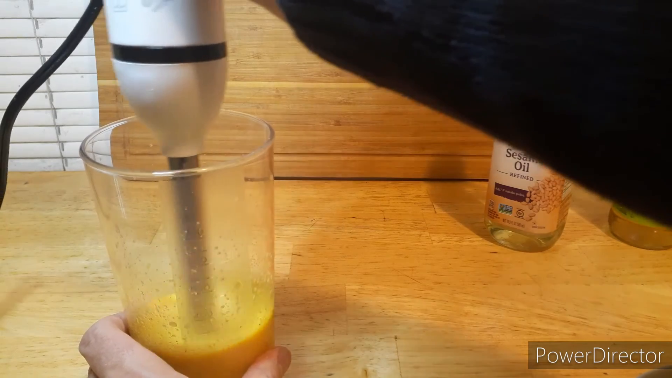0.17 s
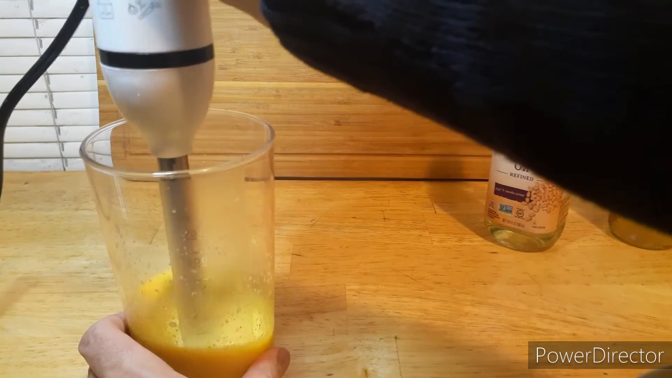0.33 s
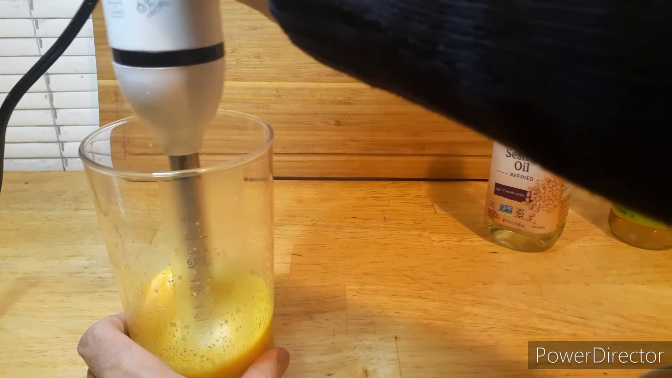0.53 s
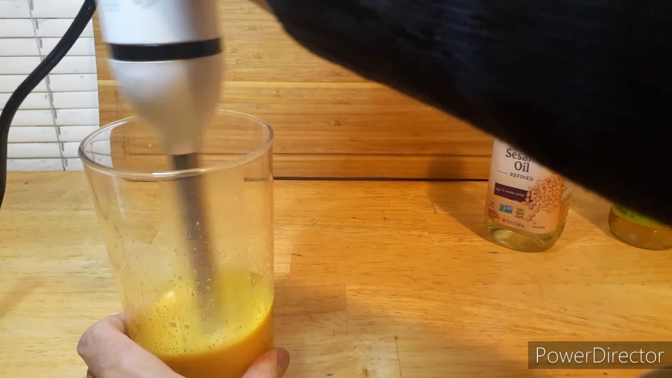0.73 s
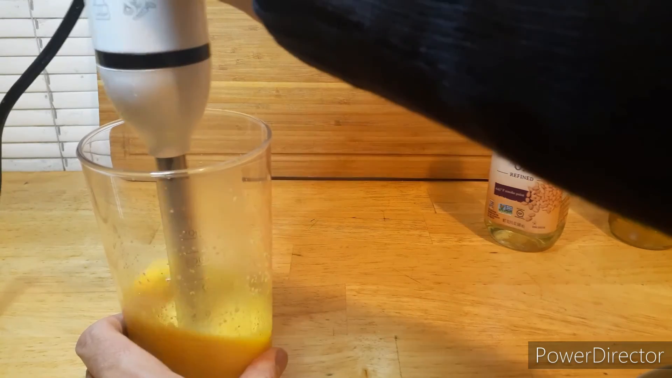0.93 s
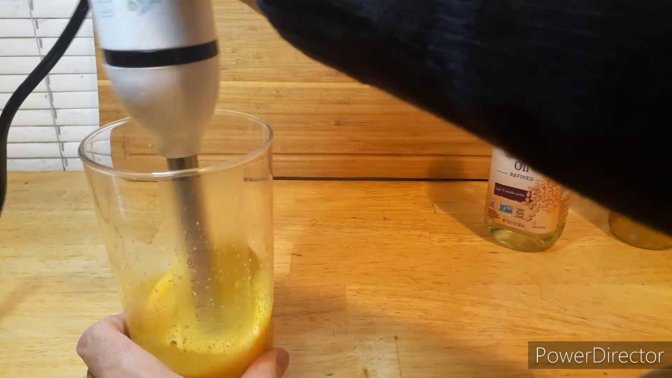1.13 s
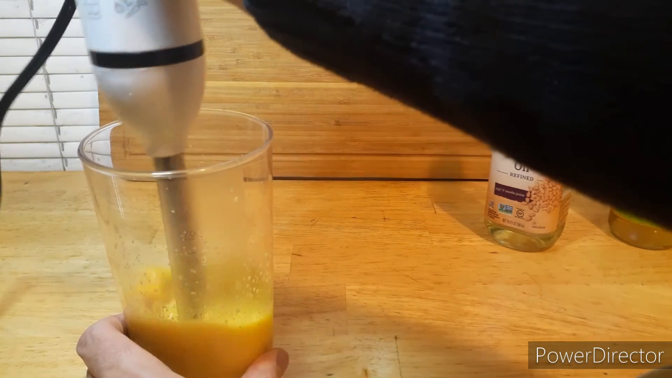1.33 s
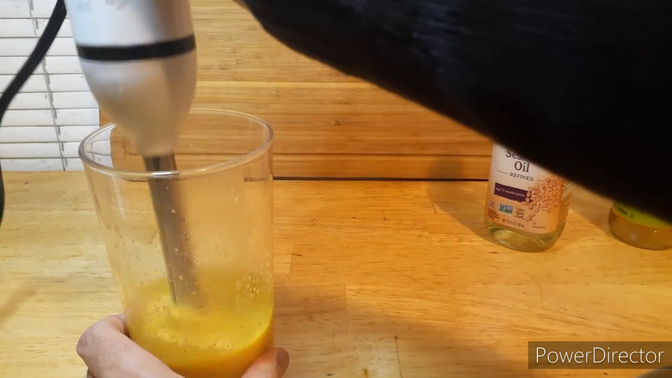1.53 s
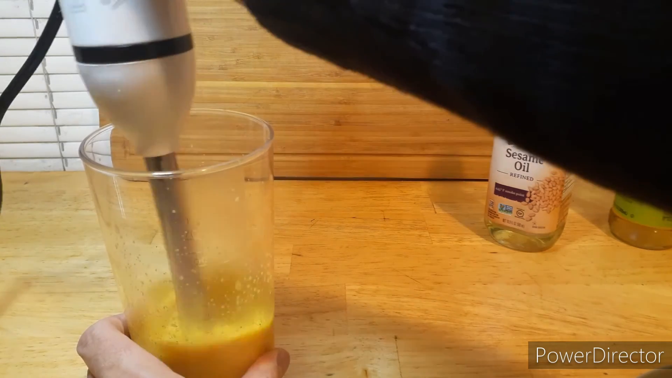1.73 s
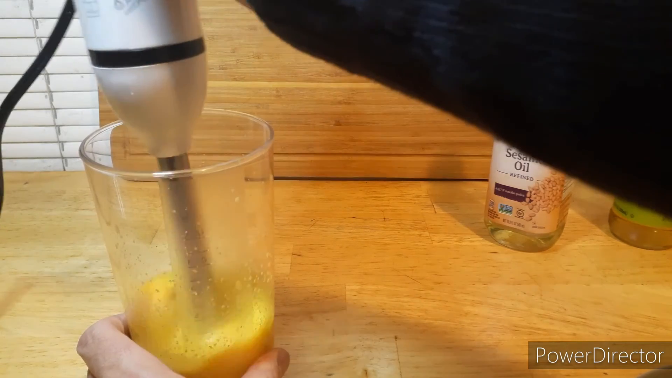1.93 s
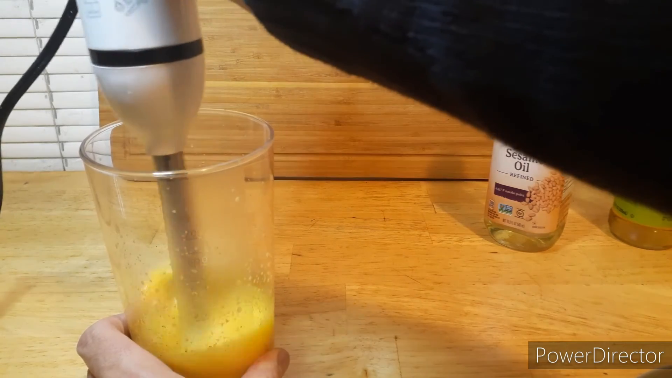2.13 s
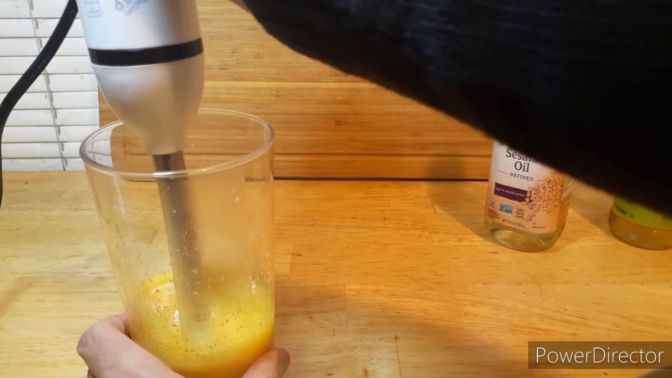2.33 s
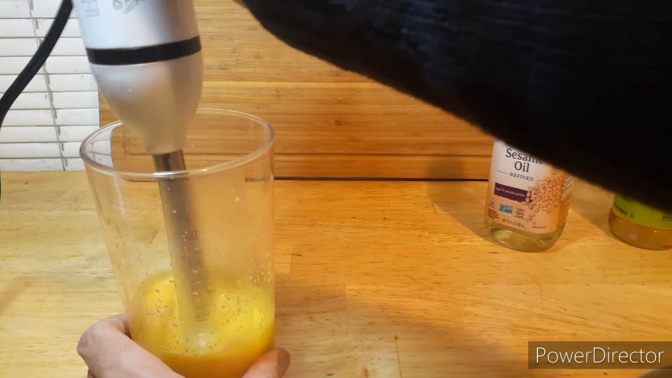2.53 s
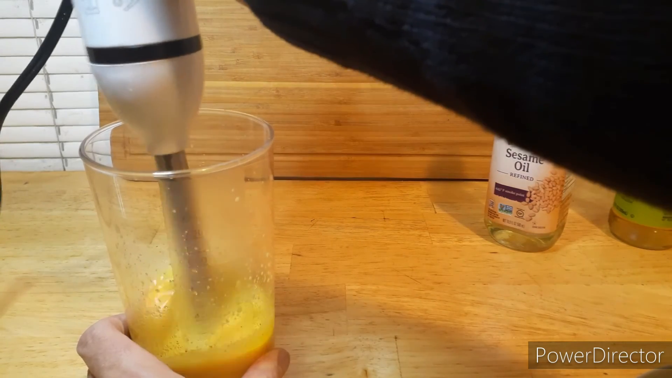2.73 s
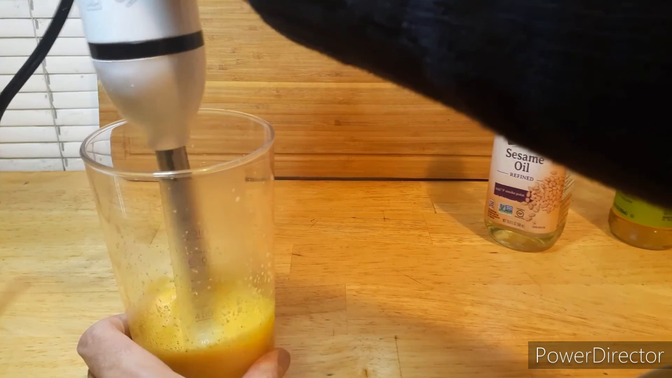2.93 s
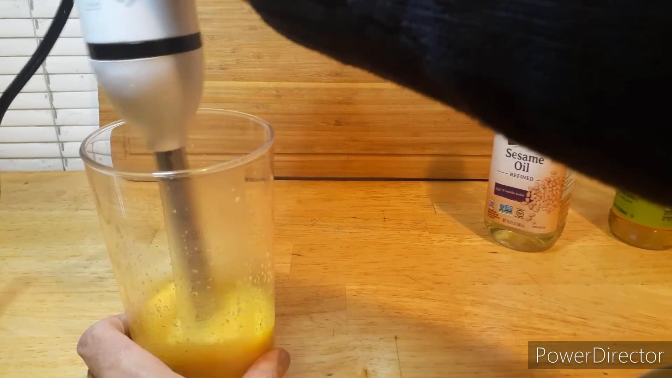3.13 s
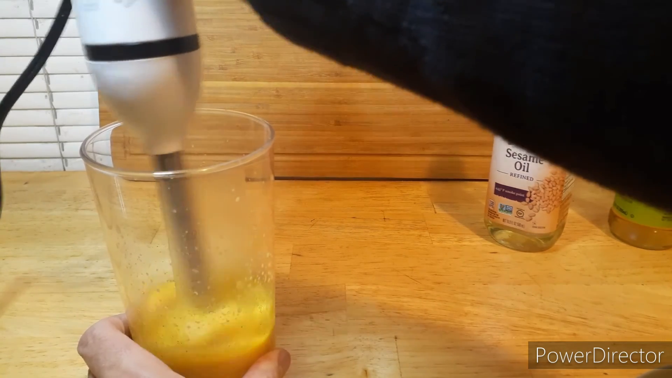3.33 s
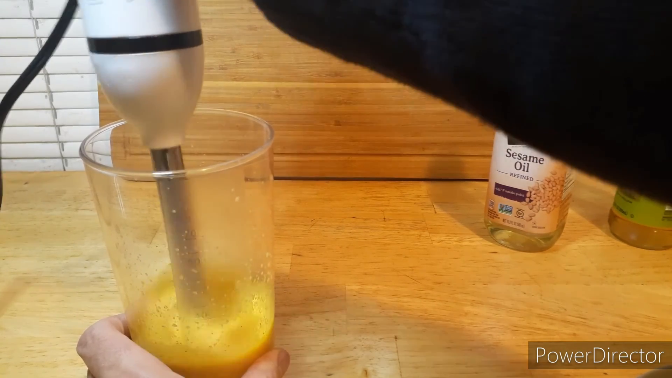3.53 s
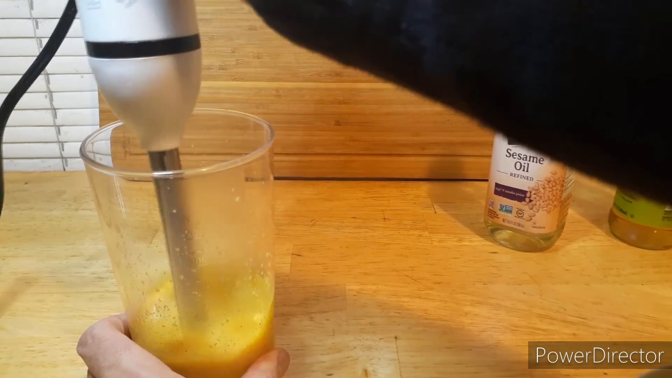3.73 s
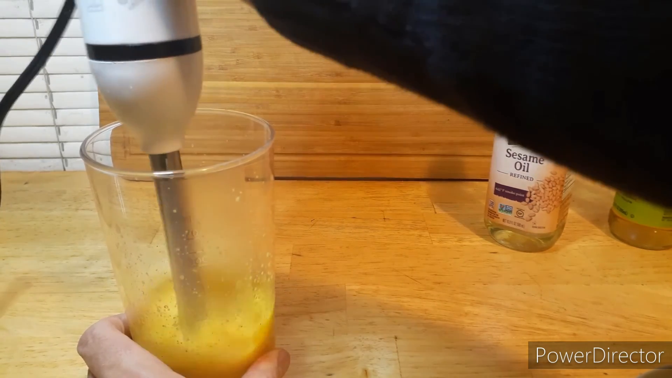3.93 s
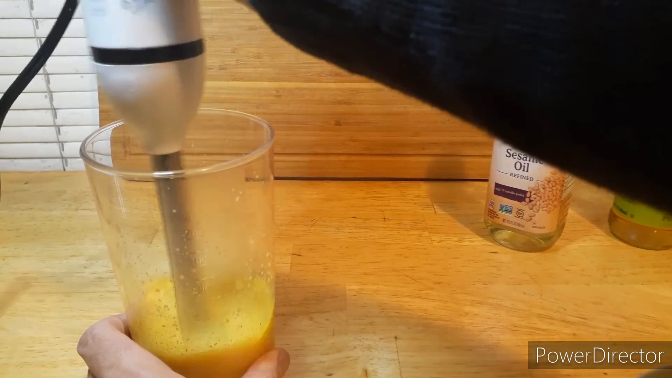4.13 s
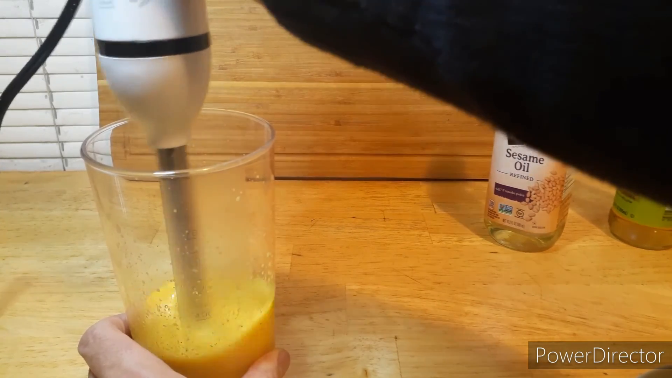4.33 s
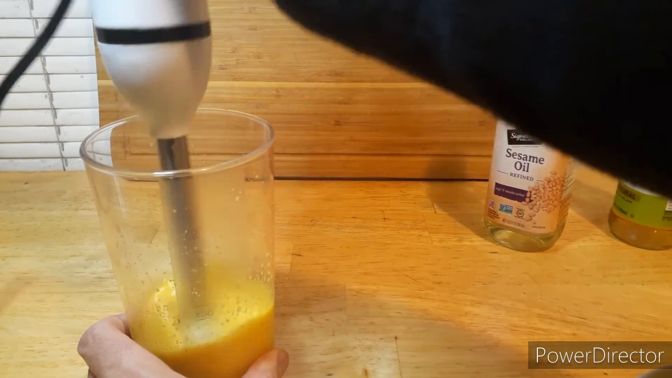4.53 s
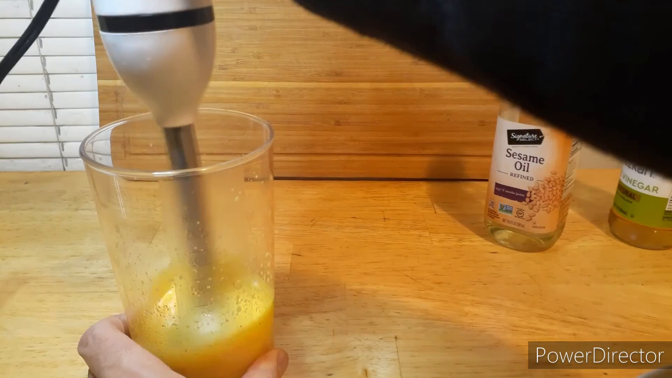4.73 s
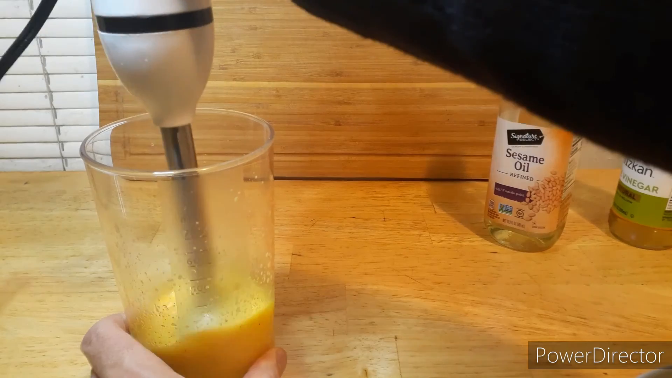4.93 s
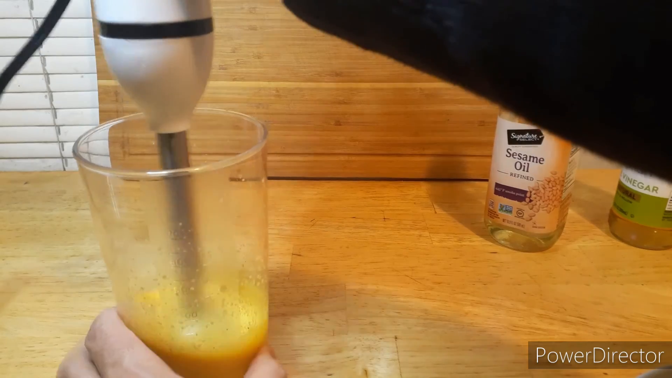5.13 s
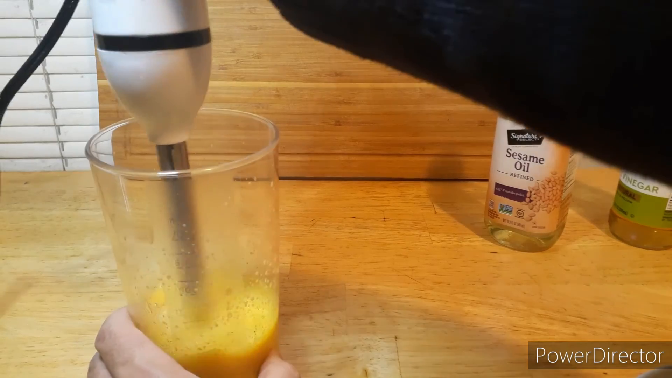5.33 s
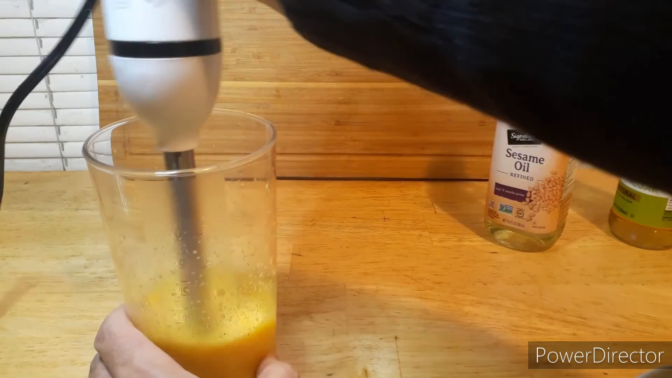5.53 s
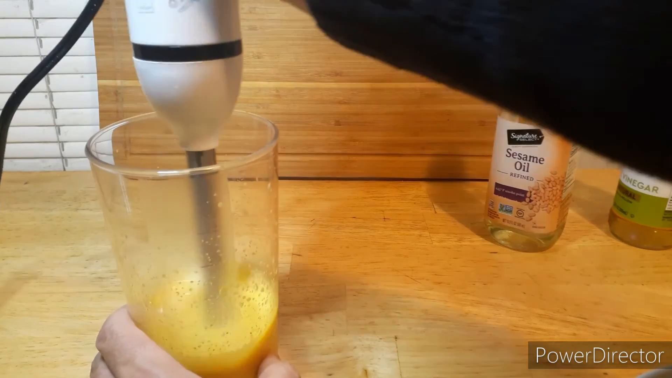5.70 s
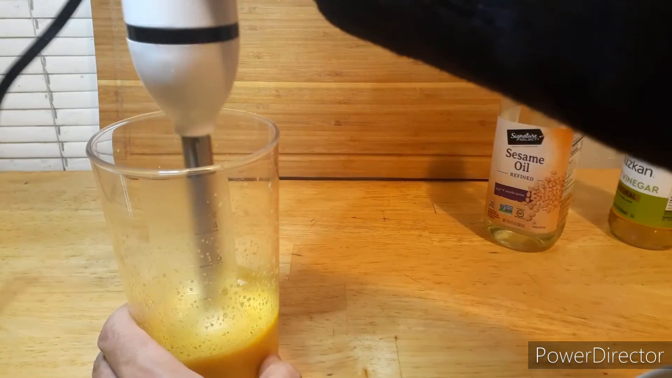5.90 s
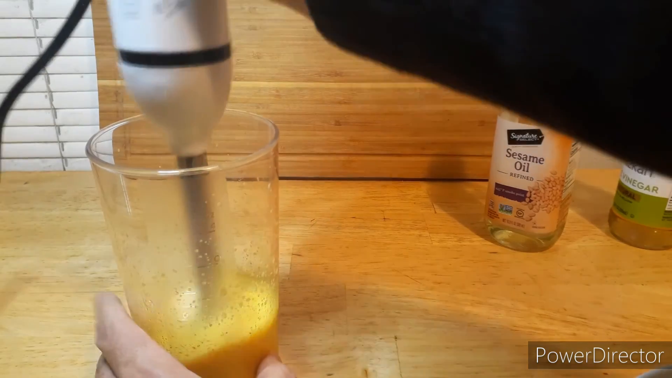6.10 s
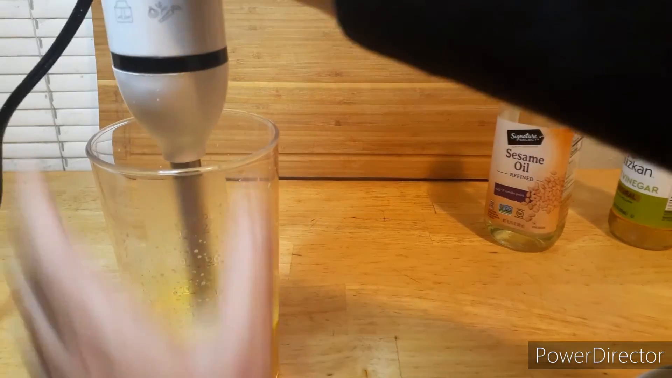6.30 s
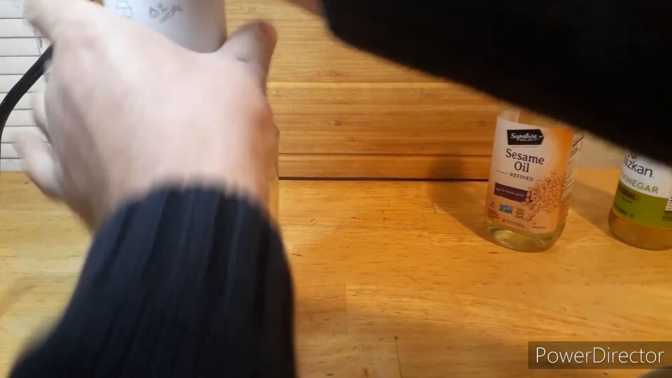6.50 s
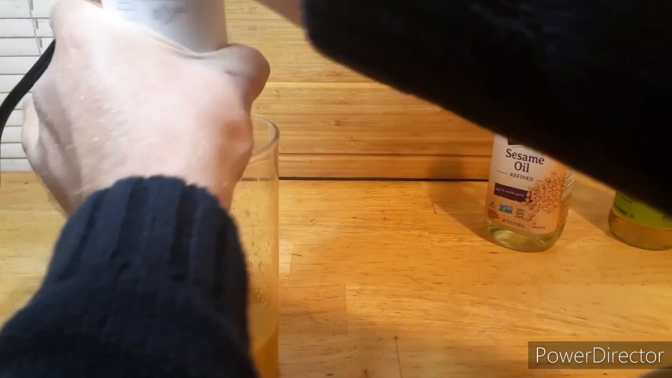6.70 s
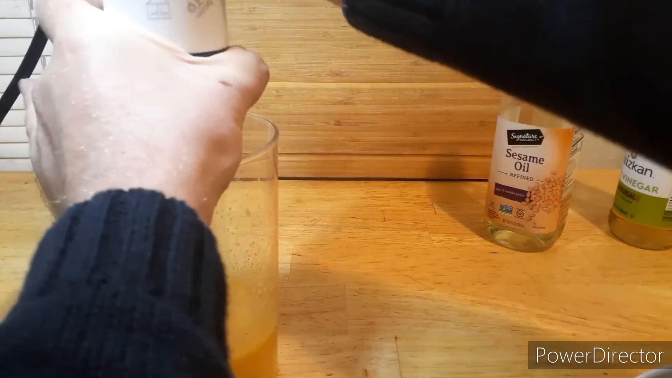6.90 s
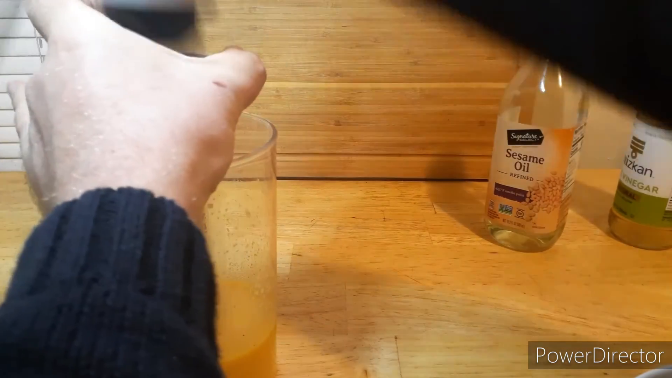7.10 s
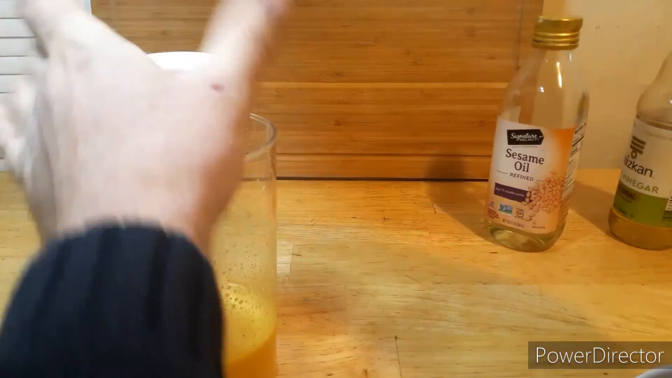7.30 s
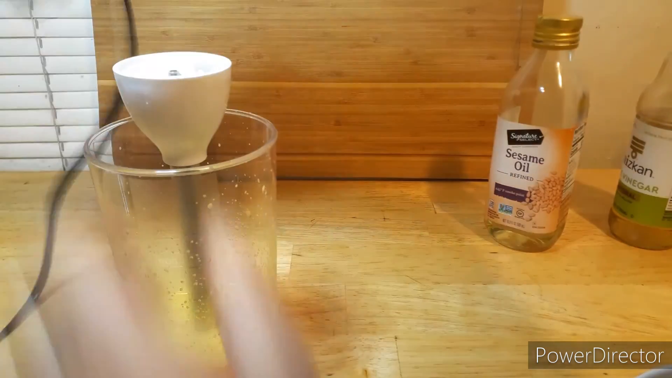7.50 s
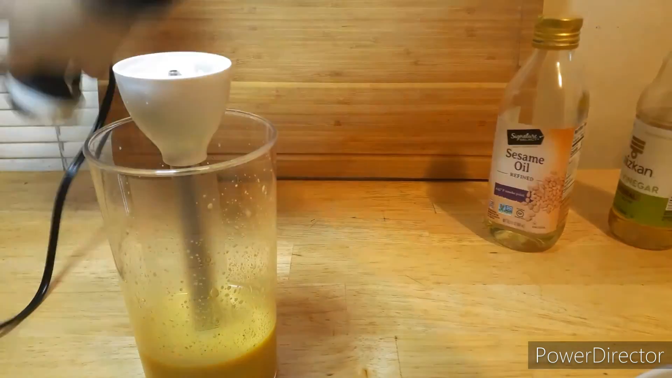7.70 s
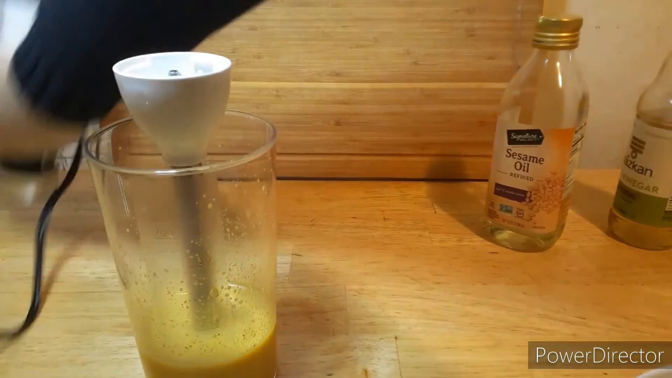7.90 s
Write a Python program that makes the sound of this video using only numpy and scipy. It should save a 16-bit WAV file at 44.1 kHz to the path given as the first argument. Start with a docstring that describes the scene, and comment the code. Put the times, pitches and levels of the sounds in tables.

```python
"""Stick blender in a tall cup

A stick blender churns thick dressing in a tall plastic cup on a wooden table. The motor whines on multiples
of its shaft speed over cooling air; the blades beat in step with the shaft. Turbulent noise in resonances makes
the liquid drum the cup, with splashes, lumps, droplets and whistles. The switch is let go and drag coasts the
shaft to rest; then hands twist the motor off with knocks, clicks and a short scrape: thuds, rings and rough
slips. The table rumbles below and faint room air lies under it all."""
import sys
import numpy as np
from scipy import signal
from scipy.fft import rfft, irfft, next_fast_len
from scipy.io import wavfile

SR = 44100
rng = np.random.default_rng(int(sys.argv[2]) if len(sys.argv) > 2 else 0)


def undo_db(level):
    """Turn decibels back into plain size, where 20 dB means ten times bigger."""
    steps = np.asarray(level, float) / 20
    return 10 ** steps


def store_pcm(level_fs):
    """Save levels as 16-bit WAV."""
    pcm = np.round(np.clip(level_fs, -1, 1) * 32767).astype(np.int16)
    wavfile.write(sys.argv[1], SR, np.atleast_2d(pcm).T)


N = 350576  # length in samples
CUP_HZ = 592.9  # main ring of the cup wall

# Shaft under power; the last row is the switch-off: (time [s], speed [turns/s])
SHAFT_SPEED = [(0.06, 209.3), (0.8, 209.7), (1.6, 209.4), (1.98, 207.5), (2.6, 208.4), (3.3, 207.9),
               (4.38, 207.3), (4.86, 210.2), (5.1, 209.9), (5.34, 207.3), (5.534, 207.3)]
# Whine of rotor and brushes: (multiple of shaft speed, relative level [dB])
WHINE_MULTIPLES = [(5, -50), (6, -49), (7, -48), (11, -60), (13, -59), (15, -58), (19, -63), (21, -64),
                   (22, -63), (23, -64), (24, -61), (25, -62), (26, -65), (27, -62), (28, -67), (29, -63),
                   (30, -58), (31, -56), (32, -59), (33, -65), (34, -67), (35, -67), (36, -61), (37, -61),
                   (38, -65), (39, -60), (40, -64), (41, -62), (42, -58), (43, -67), (44, -66), (45, -60),
                   (46, -64), (47, -62), (48, -65), (49, -64), (51, -67), (52, -72), (53, -72), (54, -65),
                   (55, -70), (56, -70), (58, -73), (60, -69), (61, -71), (62, -79), (63, -80), (64, -79),
                   (65, -81), (66, -78), (67, -81), (68, -82), (69, -79), (71, -84), (72, -81)]
# Broad spectrum of the motor: (frequency [Hz], relative level [dB])
MOTOR_SPECTRUM = [(200, 11), (700, 12), (2000, 9), (3500, 1), (5000, 2.5), (6500, -2), (9000, 0.5),
                  (11000, -2.5), (13000, -10.5), (15500, -19), (20000, -29)]
# Humps of the motor's shell: (frequency [Hz], width [Hz], height [dB])
SHELL_HUMPS = [(3220, 200, 1.9), (4220, 270, 3.7), (5230, 250, 5), (6520, 770, 5.7), (6970, 160, 1.6),
               (7900, 89, 1), (8870, 370, 3.3), (10200, 400, 1.9), (11500, 300, 1.8), (12200, 300, 2)]
# Shell humps that stand out once the current is off: (frequency [Hz], width [Hz], height [dB])
COASTING_SHELL_HUMPS = [(2340, 270, 4), (4320, 430, 3.5), (5000, 900, 1), (6100, 300, 6), (7150, 880, 7.5),
                        (8300, 200, 9), (9150, 450, 6), (10100, 500, 0), (10900, 400, 2), (12100, 700, 4),
                        (14000, 2500, 5)]
# The hand steers the blender: (time [s], vigour of the swirl [dB], cup pressed on the table as drone [dB],
# blades biting as beat [dB], extra froth near the surface [dB])
HAND_STEERING = [(0.0, 0, -25, -30, -1.5), (0.5, -0.5, -22, -27.5, 1), (0.85, -1.5, -25, -37, -1),
                 (1.15, -3.5, -23, -34.5, 2), (1.45, -4, -20, -39, -4.5), (1.65, -3.5, -23.5, -25, -0.5),
                 (1.9, -1, -26, -25.5, 1.5), (2.1, -1, -24, -26.5, 1), (2.4, -0.5, -23, -25.5, 0),
                 (2.58, -4, -21.5, -41.5, -1.5), (2.8, -1, -23, -19, 0), (3.0, -1, -23, -27, 1),
                 (3.25, 1, -25.5, -27, -0.5), (3.6, 2, -24.5, -26.5, 0.5), (3.9, 2, -23.5, -25.5, 2),
                 (4.25, -0.5, -26, -27.5, 1.5), (4.5, 1.5, -21.5, -28, 1), (4.68, -7.5, -24, -26.5, 1),
                 (4.8, -8.5, -25.5, -39.5, -7), (4.92, -21, -33, -52, -6), (5.2, -10, -31, -54, -7.5),
                 (5.31, 0, -26, -49, -6.5), (5.38, 0.5, -24, -30.5, -2), (5.6, 0.5, -28, -18.5, 0),
                 (5.7, -2.5, -25.5, -38, 0), (5.87, -5, -28.5, -42, -2.5), (6.0, -10, -33.5, -45, 1),
                 (6.1, -10, -36, -47, -1.5), (6.35, -13, -36.5, -52, -5), (6.52, -25.5, -41.5, -61, -3.5),
                 (6.62, -36.5, -46, -58, -3), (6.95, -48.5, -53, -66, -.5)]
# Gulps (+) and air pockets (-) under the blades: (time [s], swirl change [dB], table drone change [dB])
GULP_MOMENTS = [(0.005, 2, 2.5), (0.43, 4, 6.5), (0.951, 2, 8.5), (1.03, 2, 4.5), (1.24, 8, 2),
                (1.36, -4.5, -1.5), (1.49, 4, 2), (1.62, -4, 0), (1.82, 1.5, -1.5), (1.95, 1.5, 2.5),
                (2.14, -1.5, 5.5), (2.62, 3, -1), (2.84, 2, 4.5), (2.92, -2, 0.5), (3.04, 0, 7),
                (3.29, -2, 5.5), (3.35, 0.5, -4), (4.15, -2, .5), (4.35, 5, 5), (4.395, -7.5, -2),
                (4.47, 1, 3.5), (4.57, -6.5, 5), (4.93, 1, -3), (4.63, 0, 0.5), (4.71, -2, 3),
                (5.04, 10, 6), (5.11, 0.5, -2), (5.25, -1.5, 5.5), (5.52, -0.5, 5.5), (6.14, -2, 13)]
# How each layer obeys, one row each: (base level [dB], share of vigour [dB/dB],
# share of the shaft's slowing [dB/dB], own wavering [dB])
CUP_RESPONSE = (-19.5, 1.08, 0.1, 0.1)
CHURN_RESPONSE = (-24, 0.54, 0.8, 0.77)
SPRAY_RESPONSE = (-32.5, 0.55, 0.6, 1.3)
AIR_RESPONSE = (-41.5, 0.09, 1.87, .5)
TRIPLE_BEAT_RESPONSE = (-26, 0.55, .3, 2)
# Resonances of table, cup wall, churning air column and spray: (frequency [Hz], width [Hz], gain [dB])
TABLE_RESONANCES = [(134.3, 45, -6), (173.4, 44.4, -2.5), (234.3, 39.5, -7.5), (335, 20, -19)]
CUP_RESONANCES = [(391.7, 60, 1.76), (504.7, 29, 2), (582, 35, 9.1), (708, 86, 0.71)]
CHURN_RESONANCES = [(814, 48, 2.5), (931, 79, 0), (1084, 69, 5.5), (1216, 530, -7.5)]
SPRAY_RESONANCES = [(1460, 420, -1.5), (1825, 208, 1.5), (2306, 50, -4.5), (2803, 206, -5.5),
                    (3055, 122, -3.5), (3670, 1330, -14)]
# Splashes against the wall: (time [s], slap [dB], drops [dB], mist [dB], rise [s])
SPLASH_MOMENTS = [(1.212, -38, -31, -39, 0.01), (1.222, -42, -27, -39, 0.014),
                  (1.33, -28, -31.5, -44, 0.014), (2.121, -18, -43, -30, 0.0073),
                  (2.2463, -26, -31, -36, 0.0042), (2.54, -23, -28, -32, 0.0047),
                  (2.885, -20, -38, -40, 0.0055), (2.998, -26, -45, -49, 0.0044),
                  (3.072, -34, -31.5, -39, 0.0038), (3.094, -37, -45, -47, .004),
                  (3.121, -23, -47, -44, 0.0045), (3.246, -25.5, -35, -44, 0.0085),
                  (3.542, -16, -37, -44, 0.0062), (3.575, -38, -31, -49, 0.0094),
                  (3.599, -32, -30, -47, 0.0071), (3.72, -35, -45, -42, .004),
                  (3.747, -21, -23.5, -34, 0.005), (3.761, -34, -26, -33.5, 0.006),
                  (3.815, -22, -51, -31, 0.0038), (3.882, -27, -28, -42, 0.0039),
                  (3.934, -28, -31.5, -39, .004), (4.1, -28, -37, -48, .004),
                  (4.1647, -15, -30, -27.5, 0.0036), (4.186, -25, -27.5, -33, .004),
                  (4.289, -28, -44, -36, .004), (4.338, -15, -24.5, -34, 0.01),
                  (4.476, -28, -33, -49.5, 0.0044), (4.508, -14, -27, -33, 0.01),
                  (4.617, -15, -30, -33, 0.011), (4.692, -33.5, -24.5, -43, 0.0083),
                  (4.752, -39, -31.5, -41, 0.006), (4.792, -37, -38, -37, 0.01),
                  (5.032, -35, -51, -50, 0.0042), (5.164, -26, -50, -49, 0.0047),
                  (5.233, -29, -49, -50, 0.0035), (5.33, -17.5, -32, -41, 0.02),
                  (5.36, -29, -40, -33, .004)]
# Lumps flung at the cup wall: (time [s], starting level [dB])
LUMP_BLOWS = [(0.037, -15.5), (0.247, 1), (0.389, 3), (0.451, 0), (0.558, 3), (1.004, 1), (1.626, -18),
              (1.721, -3), (2.237, -5), (2.29, -3), (2.358, -4), (3.129, -2), (3.246, 1.5), (3.617, 4.5),
              (3.706, 1.5), (4.144, 9), (4.286, -2), (4.342, 8.5), (4.475, 3.5), (4.508, -3.5),
              (4.618, -14), (4.697, 0), (5.165, -6.5), (5.233, -3.5), (5.296, -7), (5.462, -8)]
# Brief whistles of the froth: (time of centre [s], length [s], frequency [Hz], relative level [dB])
FROTH_WHISTLES = [(3.556, .05, 3060, -30.5), (4.333, 0.018, 3200, -38), (4.356, 0.04, 2740, -24.5),
                  (4.446, 0.021, 3200, -44), (4.541, .025, 2860, -29.5), (4.805, 0.045, 5400, -40)]
# Knocks of cup and housing: (time [s], table thud [dB], thud frequency [Hz], cup wall ring [dB], latch ring [dB])
HAND_KNOCKS = [(6.11, -19, 176, -51, -48), (6.14, -14.5, 237, -28.5, -48), (6.676, -26.5, 170, -61, -68),
               (6.71, -42.5, 180, -45, -38), (6.739, -26, 181, -46, -61), (6.795, -17.5, 184, -52, -55),
               (6.876, -27.5, 182, -54, -60), (6.895, -47, 180, -57, -48), (6.918, -28, 159, -60, -63),
               (7.048, -21, 185, -47.5, -45), (7.074, -14.5, 211, -35, -60), (7.094, -14.5, 196, -55, -58),
               (7.26, -43, 98, -59, -56), (7.3624, -55, 200, -54, -67), (7.3913, -39, 228, -29, -30.5),
               (7.3934, -9, 224, -36, -48), (7.45, -19.5, 230, -40, -50), (7.5103, -40, 228, -31.5, -42),
               (7.518, -13.5, 230, -33.5, -41), (7.6724, -52, 200, -54, -54), (7.713, -22, 66, -56, -60),
               (7.729, -20, 70, -58, -65), (7.746, -29, 209, -44, -62), (7.7606, -35, 199, -54, -62)]
# Cup wall after a knock: (frequency [Hz], width [Hz], gain [dB])
WALL_CLICK_RESONANCES = [(904, 24, -1), (617, 200, -9), (1560, 700, -0.5), (400, 120, 18), (1110, 93, 8)]
# Crack of plastic: (frequency [Hz], width [Hz], gain [dB])
CRACK_RESONANCES = [(1060, 190, 0), (1650, 270, -8), (3060, 300, 1), (3900, 400, 4), (4800, 440, 2.5),
                    (5800, 1100, 0), (8940, 3700, -11)]
# Hollow parts that ring on: (time [s], frequency [Hz], width [Hz], starting level [dB], decay by 60 dB [s])
HOLLOW_RINGS = [(7.078, 880, 120, -36, 0.12), (7.1, 900, 70, -46, 0.28), (7.078, 560, 40, -47, .23),
                (7.077, 350, 40, -45, 0.23), (7.392, 690, 150, -28, 0.027), (8, 410, 40, -33.5, .15),
                (7.52, 390, 80, -48, 0.14), (7.73, 380, 110, -54, .5), (7.515, 2100, 400, -45, 0.31),
                (7.515, 1480, 150, -47, 0.3)]
# Plastic dragged on wood: (time [s], relative level [dB], extra treble [dB])
SCRAPE_COURSE = [(7.745, -69, 3.5), (7.76, -47, -3), (7.795, -45, -3.5), (7.83, -50.5, -3.5),
                 (7.87, -49, 2), (7.885, -51, -2), (7.91, -52, 4), (7.95, -49, 10)]
# Rings of the scraped plastic, main and treble: (frequency [Hz], width [Hz], gain [dB])
SCRAPE_RESONANCES = [(640, 80, 0), (1300, 120, -1), (1500, 95, 3), (2130, 70, -1), (2280, 70, 5.5),
                     (2950, 100, -5), (3700, 180, -15)]
SCRAPE_TREBLE_RESONANCES = [(4400, 250, -13), (5010, 148, -20), (6700, 400, -11), (9300, 500, -17.5),
                            (11500, 1200, -24.5)]
# Hands and cup shift on the table: (time [s], peak rumble [dB])
TABLE_BUMPS = [(0.38, -33), (0.55, -35), (0.88, -30.5), (1.2, -33), (1.48, -32), (1.92, -24), (2.61, -29),
               (3.9, -33), (4.05, -29.5), (4.23, -26), (4.8, -32), (5.05, -31.5), (5.6, -29), (5.71, -30),
               (6.12, -21), (6.29, -31), (6.8, -33.5), (7.08, -32), (7.41, -36), (7.5, -58), (7.73, -34)]
# Spectrum of the table's rumble: (frequency [Hz], relative level [dB])
RUMBLE_SPECTRUM = [(12, -33), (25, -11), (48, -3.5), (65, 3), (82, -7), (110, -7.5), (140, -3.5),
                   (400, -52), (1500, -110)]
# Spectrum of the room's air: (frequency [Hz], relative level [dB])
ROOM_SPECTRUM = [(88, -29), (150, -6), (313, -7), (453, -7), (693, -16.5), (945, -12.5), (1630, -29),
                 (2260, -29), (4630, -31.5), (15400, -34.5)]


def in_time(rows):
    """Turn the columns of a table into curves over all samples."""
    s, *columns = np.transpose(rows)
    return [np.interp(np.arange(N) / SR, s, c) for c in columns]


def rms_one(x):
    """Scale to unit rms."""
    return x / np.sqrt(np.mean(x ** 2) + 1e-20)


def at_hz(points, hz):
    """Read a spectrum on a log-frequency axis."""
    point_hz, point_db = np.array(points).T
    return np.interp(np.log(hz + 1), np.log(point_hz), point_db)


def humps_db(hz, humps):
    """Bell-shaped humps on a flat spectrum."""
    return sum(db / (1 + (2 * (hz - top_hz) / width_hz) ** 2) for top_hz, width_hz, db in humps)


def colour(x, db_at):
    """Weight a sound by a fixed level in dB for every frequency."""
    size = next_fast_len(N)
    gain = undo_db(db_at(np.fft.rfftfreq(size, 1 / SR)))
    return irfft(rfft(x, size) * gain, size)[:N]


def drift(corner_hz):
    """Slow random wandering of rms 1: noise through two equal low-pass poles, run at SR / 20."""
    r = np.exp(-2 * np.pi * corner_hz * 20 / SR)
    slow = signal.lfilter([1], [1, -2 * r, r * r], rng.standard_normal(N // 20 + 2002))[2000:]
    return np.interp(np.arange(N) / 20, np.arange(len(slow)), rms_one(slow))


def resonate(x, rings):
    """Parallel resonances with alternating signs."""
    out = 0
    for k, (hz, width_hz, db) in enumerate(rings):
        r = np.exp(-np.pi * width_hz / SR)
        poles = [1, -2 * r * np.cos(2 * np.pi * hz / SR), r * r]
        zeros = np.array([1, 0, -1]) * (1 - r * r) / 2
        out = out + (-1) ** k * undo_db(db) * signal.lfilter(zeros, poles, x + 1e-18)
    return out


def moving_ring(hz, width_hz):
    """Noise of rms 1 in one resonance whose centre glides."""
    r = np.exp(-np.pi * width_hz / SR)
    a, b = signal.lfilter([1], [1, -2 * r, r * r], rng.standard_normal((2, N)))
    angle = 2 * np.pi * np.cumsum(hz) / SR
    return rms_one(a * np.cos(angle) + b * np.sin(angle))


def band(x, low_hz, high_hz):
    """Steep band-pass that keeps the valleys dark."""
    return signal.sosfilt(signal.butter(2, [low_hz, high_hz], "band", fs=SR, output="sos"), x)


def lumpy(slow_db, fast_db):
    """Noise whose strength heaves with eddies and bursts with collapsing air pockets."""
    return rng.standard_normal(N) * undo_db(slow_db * drift(17) + fast_db * drift(91))


def grit(per_s, spread_db):
    """Clicks at random moments, of uneven size and sign."""
    sizes = undo_db(spread_db * np.minimum(rng.exponential(1, N), 4)) * rng.choice([-1, 1], N)
    return sizes * (rng.random(N) < per_s / SR)


def ringing(rows):
    """Short tones of noise in a narrow ring: rows of (time [s], frequency [Hz], width [Hz], envelope)."""
    out = np.zeros(N + SR)
    for s, hz, width_hz, shape in rows:
        noise = rng.standard_normal(2 * len(shape))
        settled = resonate(noise, [(hz, width_hz, 0)])[len(shape):]
        out[round(s * SR):][:len(shape)] += shape * rms_one(settled)
    return out[:N]


def obey(law, vigour_db, slowing_db):
    """Level of a layer from the swirl, the shaft speed and some chance."""
    db, by_vigour, by_speed, waver_db = law
    return db + by_vigour * vigour_db + by_speed * slowing_db + waver_db * drift(4.24)


def shaft_turns():
    """Turns so far and speed; after switch-off friction plus liquid drag brake the shaft to rest."""
    dry_drag, wet_drag = 120, .00284  # loss [turns/s^2] = dry + wet * speed^2
    speed, = in_time(SHAFT_SPEED)
    off_s, last = SHAFT_SPEED[-1]
    scale, pace = np.sqrt(dry_drag / wet_drag), np.sqrt(dry_drag * wet_drag)
    since = np.maximum(np.arange(N) / SR - off_s, 0)
    coasting = scale * np.tan(np.maximum(np.arctan(last / scale) - pace * since, 0))
    speed = np.where(since > 0, coasting, speed)
    return np.cumsum(speed) / SR, speed


def housing_db(hz):
    """The motor's broad spectrum with the humps of its shell."""
    return at_hz(MOTOR_SPECTRUM, hz) + humps_db(hz, SHELL_HUMPS)


def rotor_whine(turns):
    """One wave pattern per turn, its multiples wandering in 13 groups."""
    multiple, db = np.transpose(WHINE_MULTIPLES)
    db = db - housing_db(multiple * SHAFT_SPEED[0][1])  # the housing is added back later
    higher = np.arange(73, 101)  # these reach the audible band as the shaft slows
    higher_db = rng.normal(-69, 5, len(higher)) - .35 * (higher - 73)
    multiple, db = np.r_[multiple, higher], np.r_[db, higher_db]
    angle = np.arange(2049) / 2048  # share of a turn
    phase = rng.random((len(db), 1))
    waves = np.sqrt(2) * undo_db(db)[:, None] * np.sin(2 * np.pi * (multiple[:, None] * angle + phase))
    turns = turns + .0013 * drift(40)  # the shaft runs unevenly, which blurs the high multiples
    whine = 0
    for k in range(13):
        pattern = waves[k::13].sum(axis=0)
        whine = whine + undo_db(3.5 * drift(5) + 2 * drift(25)) * np.interp(turns % 1, angle, pattern)
    return whine


def commutator_bars(turns):
    """Twelve commutator bars sing on overtones of their passing rate, weaker upwards."""
    bars = 0
    for k in range(2, 10):
        for below in (0, 1) if k > 3 else (0,):  # the higher ones have a neighbour one multiple below
            level = undo_db(-55.5 - 1.1 * k - 3 * below + 3.5 * drift(7))
            bars = bars + level * np.sin(2 * np.pi * (12 * k - below) * turns)
    return bars


def motor(turns, speed, air_db):
    """Whine and cooling air through the housing; the bars join in while coasting."""
    last = SHAFT_SPEED[-1][1]
    whine = rotor_whine(turns)
    powered = undo_db(.5 * (air_db + 43)) * colour(whine, housing_db)
    coasting_gain = undo_db(np.minimum(air_db + 45, 3)) * np.clip(speed / 50 - 1, 0, 1)  # sinks with the air
    coasting = coasting_gain * colour(undo_db(-4) * whine + commutator_bars(turns), housing_db)
    whine = np.where(speed > .97 * last, powered, coasting)
    air = undo_db(air_db + 5) * rms_one(colour(lumpy(0.18, 0.84), housing_db))
    both = whine + air
    off = np.clip(5 - 5 * speed / last, 0, 1)  # fades the coasting shell in
    shell = colour(both, lambda hz: humps_db(hz, COASTING_SHELL_HUMPS))
    both = (1 - off) * both + off * undo_db(-1.5) * shell
    slow = np.clip(1.2 - speed / 90, 0, .7)  # a slow shaft loses its top
    dull = colour(both, lambda hz: -10 * np.log10(1 + (hz / 9600) ** 12))
    return (1 - slow) * both + slow * dull


def blade(turns, speed, table_db, beat_db, triple_db, churn_db):
    """Unbalance shakes once a turn, the two blades beat twice, with overtones; the liquid makes all waver."""
    # a slow shaft leaves the cup's rings
    in_tune = np.clip((speed / SHAFT_SPEED[0][1] - .9) / .07, 1e-3, 1)
    # the beat is heard again once as low as the table's drone
    low_beat_db = table_db - 4 - np.clip(speed - 130, 0, 50) / 2
    beat_db = np.where(in_tune < .5, low_beat_db, beat_db - 1.5 + 40 * np.log10(in_tune))
    shake_db = table_db - 2 - 7 * in_tune  # slowing through the table's drone
    fading_db = 20 * np.log10(in_tune)
    levels_db = (shake_db, beat_db, triple_db + fading_db, churn_db - 11.5 + fading_db)
    out = 0
    for multiple, db in enumerate(levels_db, 1):
        wobble = 0.06 * drift(10.5)  # turns
        tone = np.sin(2 * np.pi * multiple * (turns + wobble))
        out = out + np.sqrt(2) * undo_db(db + 4.6 * drift(23)) * tone
    return out * np.clip(speed / 40 - 1.5, 0, 1)  # too slow to shake anything


def gulps():
    """Each gulp is a short bell-shaped change in dB, for the swirl and for the table."""
    s, *db = np.transpose(GULP_MOMENTS)
    t = np.arange(0, N + 64, 64) / SR
    bells = np.exp(-((t[:, None] - s) / 0.03005) ** 2 / 2)  # standard deviation in s
    return [np.interp(np.arange(N) / SR, t, bells @ c) for c in db]


def liquid(table_db, table_hz, cup_db, churn_db, spray_db):
    """One turbulent push drives table, cup wall and air column; finer turbulence gives the spray."""
    heave = undo_db(0.33 * drift(15) + 1.33 * drift(69))
    push, fine = heave * rng.standard_normal(N), lumpy(0.26, 0.76)
    table = moving_ring(table_hz, 54.6) + rms_one(band(resonate(push, TABLE_RESONANCES), 90, 284))
    cup = heave * moving_ring(CUP_HZ + 9 * drift(3.886), 52)
    cup = cup + undo_db(-1) * rms_one(band(resonate(push, CUP_RESONANCES), 347, 980))
    churn = rms_one(band(resonate(push, CHURN_RESONANCES), 650, 2040))
    spray = rms_one(band(resonate(push + fine, SPRAY_RESONANCES), 820, 5900))
    return undo_db(table_db - 4) * table + undo_db(cup_db) * cup + undo_db(churn_db - 1.5) * churn + undo_db(spray_db) * spray


def splashes():
    """Quick swells with a slower fall: a slap on the wall, coarse drops, and mist that starts faster if short."""
    slap, drops, mist = np.zeros((3, N))
    t = np.arange(4096) / SR
    clumps = undo_db(2 * drift(100))
    for s, *levels_db, rise_s in SPLASH_MOMENTS:
        rise, at = t / rise_s, round(s * SR)
        swell = rise * np.exp(1 - rise)
        burst = (1 - np.exp(-rise / (25 * rise_s))) * np.exp(-rise / 1.3)
        for layer, db, shape in zip((slap, drops, mist), levels_db, (swell, swell, burst)):
            layer[at:at + len(t)] += undo_db(db) * shape * clumps[at:at + len(t)]
    crackle_db = 2.2 * np.minimum(rng.exponential(1, N), 3) + 2.5 * drift(150)  # clumped
    grains = rng.standard_normal(N) * undo_db(crackle_db)
    slap_noise = resonate(grains, CUP_RESONANCES + CHURN_RESONANCES)
    drop_noise = band(band(grains, 1000, 10700), 808, 4800) + 5.3 * resonate(grains, SPRAY_RESONANCES[1:])
    mist_noise = band(colour(grains, lambda hz: .5 * housing_db(hz)), 5000, 16000)
    return slap * rms_one(slap_noise) + drops * rms_one(drop_noise) + mist * rms_one(mist_noise)


def lumps():
    """Each soft blow sets the cup wall ringing briefly, at a slightly different pitch."""
    out, t = np.zeros(N + SR), np.arange(SR // 4) / SR
    for (s, db), bend in zip(LUMP_BLOWS, rng.standard_normal(len(LUMP_BLOWS))):
        ring = np.sin(2 * np.pi * CUP_HZ * (1 + 0.039 * bend) * t)
        out[round(s * SR):][:len(t)] += undo_db(db - 60 * t / 0.048) * (1 - np.exp(-t / 0.0067)) * ring
    return out[:N]


def whistles():
    """Bell-shaped whistles of narrow noise centred on their times."""
    t = np.arange(SR // 5) / SR - .1
    return ringing((s - .1, hz, 260, undo_db(db - 2) * np.exp(-(2 * t / length_s) ** 2))
                   for s, length_s, hz, db in FROTH_WHISTLES)


def droplets(activity_db):
    """Clusters of fine ticks on the wall, and lower bubbles bursting in the froth."""
    out = 0
    for low_hz, high_hz, db in ((2200, 5000, -38.5), (4000, 7700, -41), (7000, 16000, -59)):
        ticks = grit(56 * undo_db(activity_db + 7.1 * drift(9.6)), 2.5)
        puffs = signal.lfilter([1], [1, -.99], np.abs(ticks)) * rng.standard_normal(N)  # 2 ms puffs
        out = out + undo_db(db) * band(puffs, low_hz, high_hz)
    for hz in np.geomspace(500, 2000, 10):
        bubbles = grit(5.1 * undo_db(4.6 * drift(9.5)), 2.3)
        out = out + undo_db(-10) * resonate(bubbles, [(hz, hz / 20, 0)])
    return undo_db(0.54 * activity_db) * out


def knocks():
    """A crack of plastic, short rings, and a thud that swells in the table; the crack dies away in the kitchen."""
    out, t = np.zeros(N + SR), np.arange(SR // 2) / SR
    latch_hz = 2350
    for s, thud_db, thud_hz, wall_db, latch_db in HAND_KNOCKS:
        thud = undo_db(thud_db - 60 * t / 0.095) * (1 - np.exp(-t / .0025)) * np.sin(2 * np.pi * thud_hz * t)
        noise = rng.standard_normal(len(t)) * undo_db(2 * np.minimum(rng.exponential(1, len(t)), 3))  # rattly
        dying = undo_db(-60 * t / 0.027) + undo_db(-11.5 - 60 * t / 0.35)  # the crack itself, then the kitchen
        crack = undo_db(wall_db - 12) * rms_one(resonate(noise, CRACK_RESONANCES)) * dying
        wall = undo_db(wall_db - 60 * t / 0.13) * rms_one(resonate(noise, WALL_CLICK_RESONANCES))
        ring_s = 0.11 * np.clip(undo_db(2 * (latch_db + 30)), .06, 1)  # the hand damps light touches
        pair = np.sin(2 * np.pi * latch_hz * t) + 0.23 * np.sin(2 * np.pi * (latch_hz + 65) * t)
        latch = undo_db(latch_db - 60 * t / ring_s) * pair
        out[round(s * SR):][:len(t)] += thud + crack + wall + latch
    return out[:N]


def hollows():
    """Rings that swell within a few ms and die away."""
    t = np.arange(SR // 3) / SR
    return ringing((s, hz, width_hz, undo_db(db - 60 * t / t60_s) * (1 - np.exp(-t / 0.0025)))
                   for s, hz, width_hz, db, t60_s in HOLLOW_RINGS)


def scrape():
    """Uneven slips in clumps, caught by the narrow rings of the plastic."""
    level_db, treble_db = in_time(SCRAPE_COURSE)
    slips_per_s = 5400
    slips = rms_one(grit(slips_per_s * undo_db(3 * drift(45)), 2.8)) + 0.4 * rng.standard_normal(N)
    low = 0
    for ring in SCRAPE_RESONANCES:
        fade_db = .5 * treble_db * (ring[0] < 2000)  # the low rings fade as the rub brightens
        low = low + undo_db(3.5 * drift(30) - fade_db) * resonate(slips, [ring])
    high = sum(resonate(grit(slips_per_s, 2.5), [ring]) for ring in SCRAPE_TREBLE_RESONANCES)
    rings = rms_one(low) + undo_db(treble_db) * high * 1.5 / low.std()
    rub = undo_db(-11.5) * rms_one(band(slips, 1090, 3300))
    hiss = undo_db(-19.5 + treble_db) * rms_one(band(lumpy(0.99, 1.5), 4000, 13000))
    return undo_db(level_db) * (rings + rub + hiss)


def rumble(vigour_db):
    """A low tremor of the table; every bump swells fast and sinks slowly."""
    t = np.arange(N) / SR
    power = undo_db(2 * -54) + undo_db(2 * (-42 + vigour_db))  # blender at rest, plus the swirl's tremor
    for s, db in TABLE_BUMPS:
        below_db = np.maximum(300 * (s - t), 105.5 * (t - s))  # rise and fall in dB/s
        power = power + undo_db(2 * (db - below_db))
    return np.sqrt(power) * rms_one(colour(lumpy(2, 0), lambda hz: at_hz(RUMBLE_SPECTRUM, hz)))


def room_air():
    """Steady noise with the room's spectrum."""
    return undo_db(-56) * rms_one(colour(rng.standard_normal(N), lambda hz: at_hz(ROOM_SPECTRUM, hz)))


def scene():
    """All sources at one microphone, tied together by the hand and the shaft."""
    vigour_db, table_db, beat_db, froth_db = in_time(HAND_STEERING)
    turns, speed = shaft_turns()
    slowing_db = 20 * np.log10(np.clip(speed / SHAFT_SPEED[-1][1], .01, 1))
    swirl_db, swell_db = gulps()
    stirred_db = vigour_db + swirl_db
    cup_db = obey(CUP_RESPONSE, stirred_db, slowing_db)
    triple_db = obey(TRIPLE_BEAT_RESPONSE, stirred_db, slowing_db)
    churn_db = obey(CHURN_RESPONSE, stirred_db, slowing_db) + 1.18 * froth_db
    spray_db = obey(SPRAY_RESPONSE, stirred_db, slowing_db) + froth_db
    load_db = np.where(slowing_db > -.3, stirred_db + froth_db, 0)  # the load tells only under power
    air_db = obey(AIR_RESPONSE, load_db, slowing_db)
    # the bearings whir up as the shaft passes a slow speed
    air_db = air_db + 11.5 * np.exp(-((speed - 44) / 47) ** 2)
    table_db = table_db + swell_db + 0.5 * drift(4.24)
    table_hz = 177.5 + 1.22 * swell_db + 5.37 * drift(3.33)  # the drone rises a little when it swells
    beat_db = beat_db + 2 * drift(4.24)
    blender = motor(turns, speed, air_db) + blade(turns, speed, table_db, beat_db, triple_db, churn_db)
    wet = liquid(table_db, table_hz, cup_db, churn_db, spray_db) + splashes() + lumps() + whistles()
    wet = wet + droplets(.5 * vigour_db + 2 * froth_db + 3 * slowing_db)
    handling = knocks() + hollows() + scrape()
    return (blender + wet + handling + rumble(vigour_db) + room_air())[None]


def roll_off(x):
    """The treble ends steeply here."""
    return signal.sosfilt(signal.butter(12, 15540, fs=SR, output="sos"), x)


def record(dry):
    """Hold the peaks of the mix at full scale and finish it."""
    mix = np.clip(dry, -1, 1)
    return roll_off(mix)


dry = scene()
out = record(dry)
store_pcm(out)
```